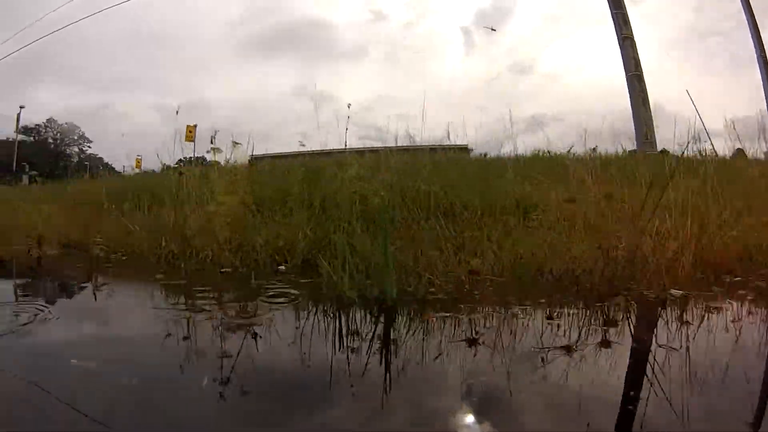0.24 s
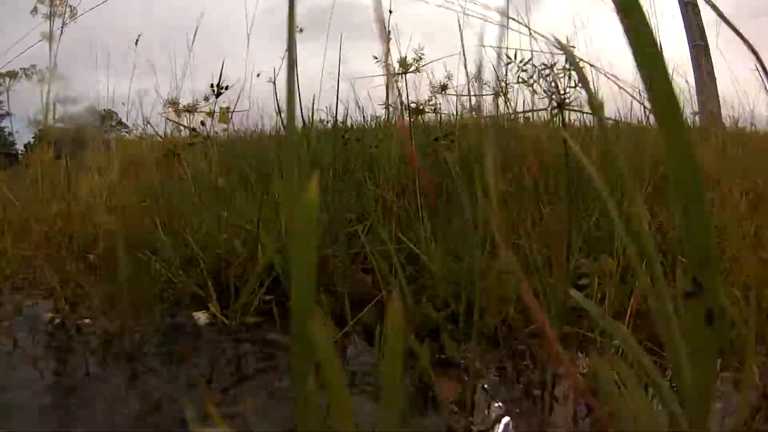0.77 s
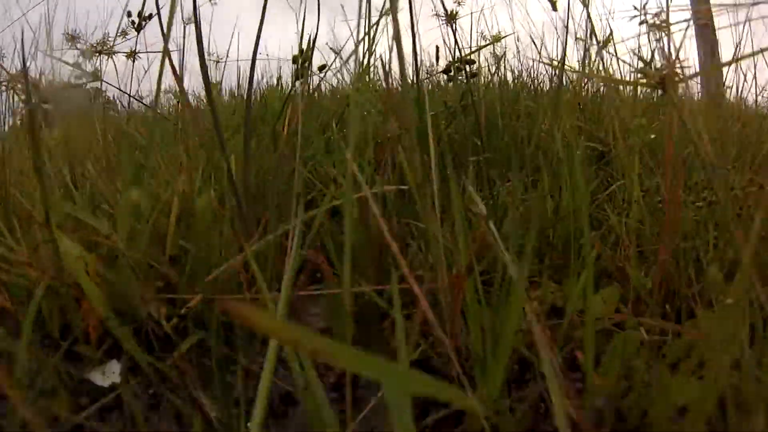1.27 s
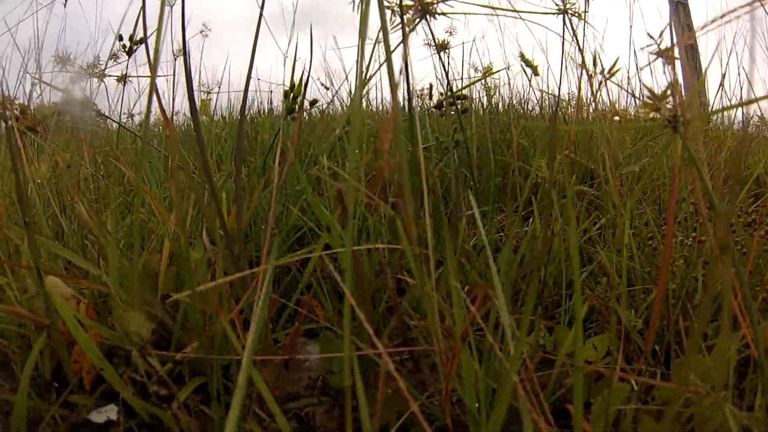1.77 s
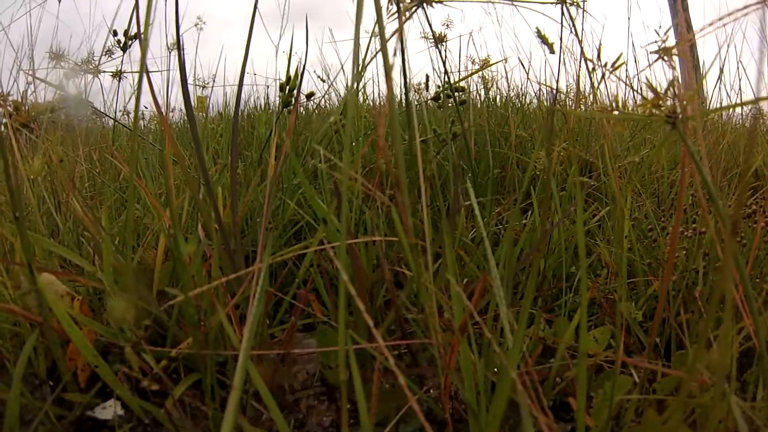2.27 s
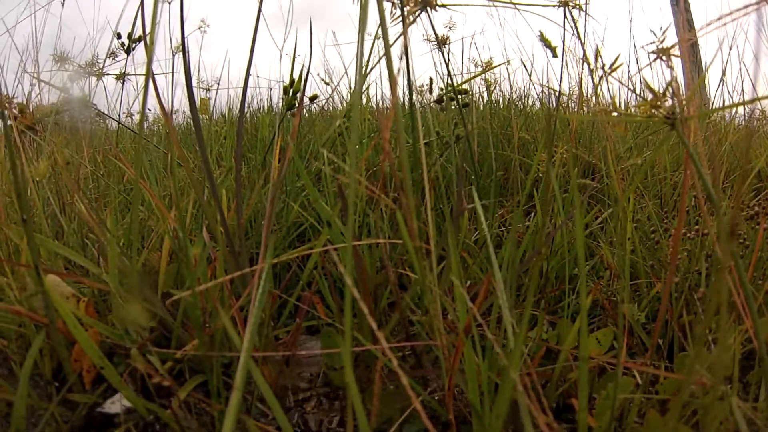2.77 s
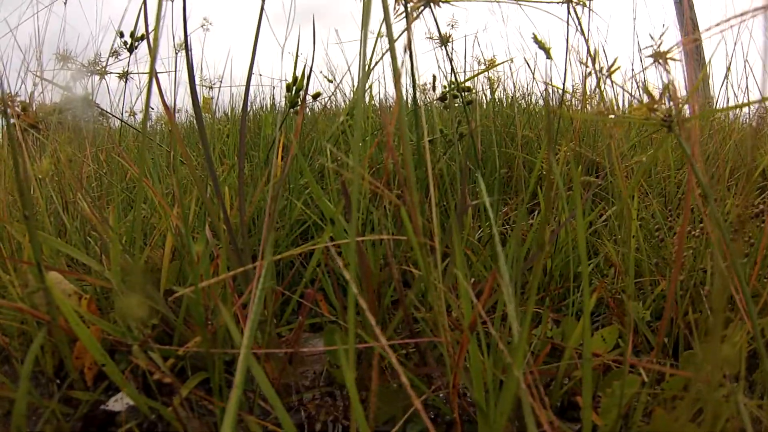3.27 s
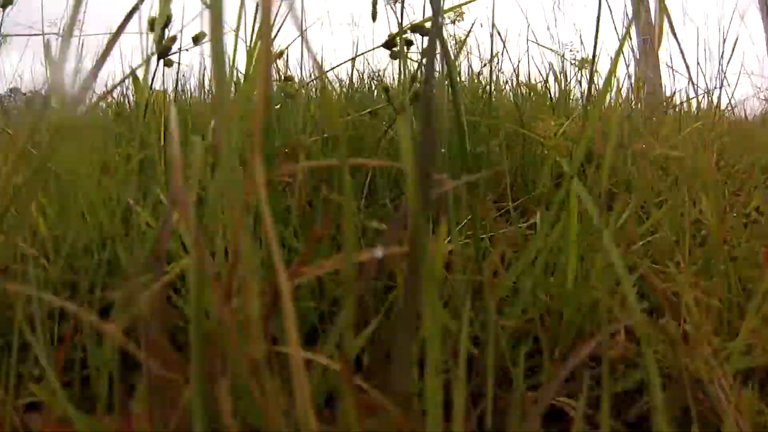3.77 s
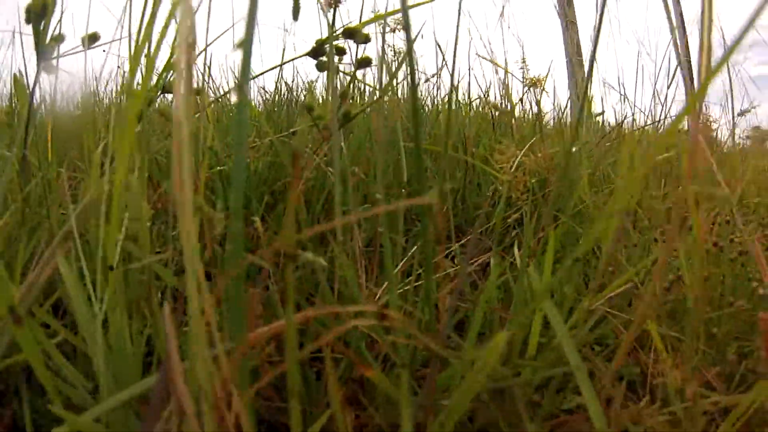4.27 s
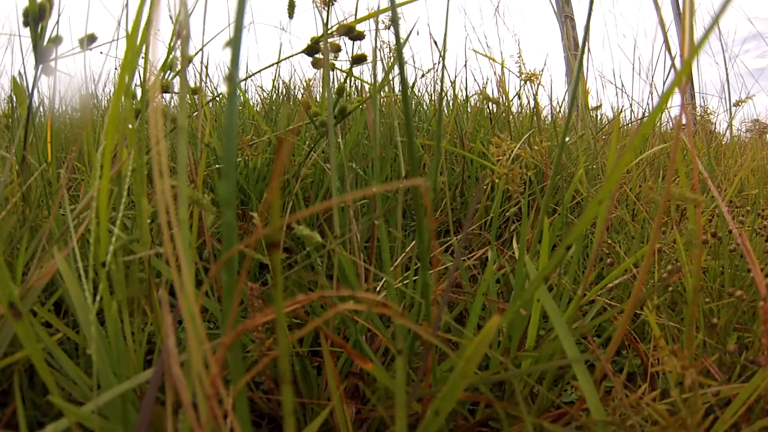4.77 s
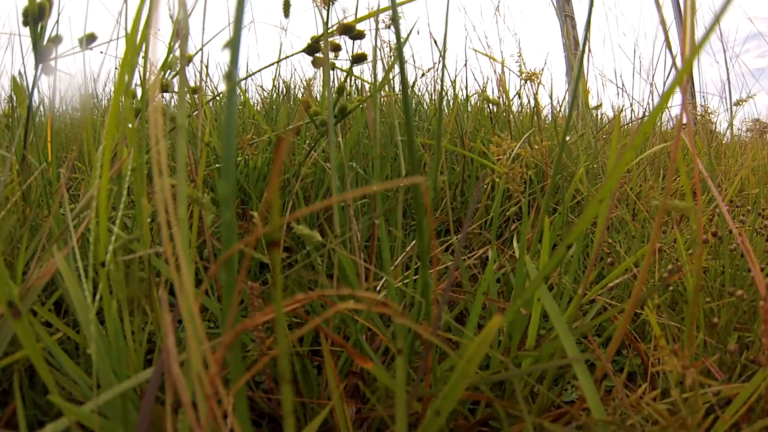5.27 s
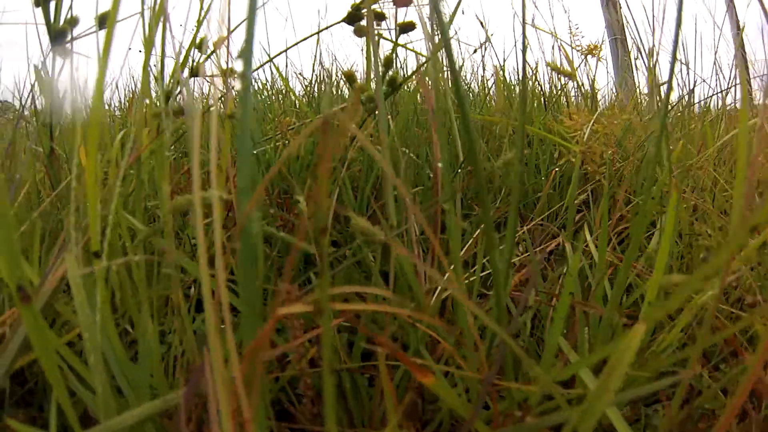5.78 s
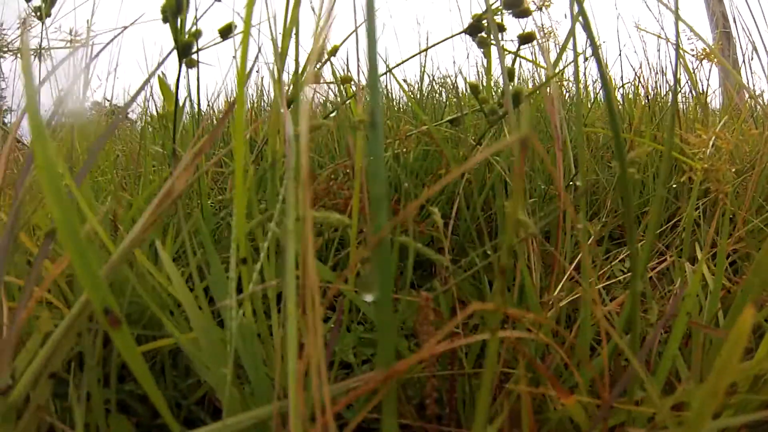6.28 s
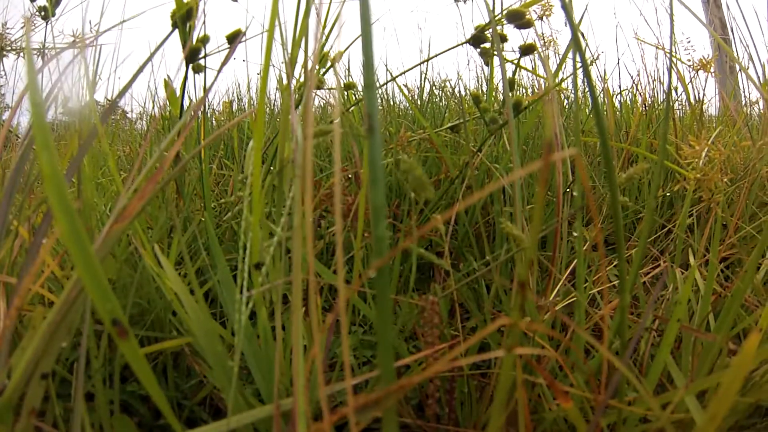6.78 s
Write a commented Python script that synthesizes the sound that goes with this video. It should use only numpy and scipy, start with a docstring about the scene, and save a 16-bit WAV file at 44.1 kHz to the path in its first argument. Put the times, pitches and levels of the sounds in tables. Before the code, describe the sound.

Ripples and knocks on a small boat's hull fade, then a servo whirs and an electric propeller whines up and down twice.

```python
"""A small electric airboat

Heard from its own deck, the boat coasts through shallow water, slapped by little waves, into grass.
The rudder's motor (a servo) clacks, whirs to and fro and ticks while holding still.
Twice the propeller motor stutters into motion, revs up with a whine, shakes the hull and runs down."""
import sys
import numpy as np
from scipy import signal
from scipy.fft import rfft, irfft
from scipy.io import wavfile
from scipy.ndimage import uniform_filter1d

SR = 44100
rng = np.random.default_rng(int(sys.argv[2]) if len(sys.argv) > 2 else 0)


def materialize(psi):
    """Save the field psi as 16-bit PCM at rate SR to the path in sys.argv[1].

    A 1-D psi becomes a single channel; in a 2-D psi each row is a channel.
    """
    bounded = np.clip(np.atleast_2d(psi).T, -1, 1)
    quanta = np.round(bounded * 32767).astype(np.int16)
    wavfile.write(sys.argv[1], SR, quanta)


N = 310464
TIME = np.arange(N) / SR
FULL_HZ = 142  # shaft turns a second at full speed

# the tone of grass on the hull: pitch_hz, level_db
GRASS = [(1500, 0.5), (4000, 1), (7500, -6.5), (10000, -23), (15000, -20)]
# how the servo's gearbox rings: pitch_hz, level_db
GEARBOX = [(500, -15), (850, -5.5), (1000, -8), (1350, 3), (1950, 10), (2250, 4), (2850, -0.5), (3200, -11),
           (3750, -7), (4600, -29), (5300, -20.5), (5950, -33), (6800, -28), (10000, -43)]
# each rev of the motor: start_s, catch_s (it takes hold), switching_end_s, blade_db, slowing_change_db
REVS = [(3.025, 3.33, 3.945, -28, -1.5), (5.119, 5.421, 6.165, -25, 5)]
# the jump in speed once the motor catches: after_catch_s, speed_hz
SPIN_UP = [(0, 24.7), (.013, 25.8), (.04, 39), (.08, 71.5)]


def amp(db):
    """Turns decibels into a gain."""
    return 10 ** (np.asarray(db) / 20)


def evened(x):
    """Scales x to an average strength (rms) of one."""
    return x / np.sqrt(np.mean(x ** 2) + 1e-20)


def steadied(x):
    """Takes the slow swell out of x."""
    return x / np.sqrt(abs(uniform_filter1d(x ** 2, size=2600)) + 1e-6)


def between(start, end):
    """One from start to end, with soft edges."""
    return uniform_filter1d(((TIME >= start) & (TIME <= end)) * 1., size=160)


def curve(rows):
    """Joins points in time with straight lines."""
    return np.interp(TIME, *np.transpose(rows))


def level(rows):
    """A decibel curve as a gain, silent outside its span."""
    return amp(curve(rows)) * between(rows[0][0], rows[-1][0])


def swells(rows, rise_db_per_s, fall_db_per_s):
    """Gain of events that swell to a peak and die away."""
    return np.max([amp(db - np.maximum(rise_db_per_s * (s - TIME), fall_db_per_s * (TIME - s)))
                   for s, db in rows], axis=0)


def gain_at(points, hz):
    """Looks up a gain among (pitch_hz, level_db) points."""
    pitches, db = np.transpose(points)
    return amp(np.interp(np.log(hz + 1), np.log(pitches + 1), db))


def colour(x, body):
    """Rings x through a body of (pitch_hz, level_db) points; comes out at strength one."""
    log_gain = np.log(gain_at(body, abs(np.fft.fftfreq(8192, 1 / SR))) + 1e-5)
    ring = np.fft.ifft(np.exp(np.conj(signal.hilbert(log_gain)))).real[:4096]  # its answer to one tap
    return evened(signal.oaconvolve(x, ring)[:len(x)])


def noise():
    """An even hiss (white noise)."""
    return rng.standard_normal(N)


def wander(hz):
    """A random wobble, up to about this rate."""
    return evened(irfft(rfft(noise()) / (1 + (np.fft.rfftfreq(N, 1 / SR) / hz) ** 4), N))


def grains(per_s, spread_db):
    """Scattered clicks of very uneven size."""
    clicks = noise() * (rng.random(N) < per_s / SR)
    return evened(clicks * amp(spread_db * np.minimum(rng.exponential(1, N), 4)))


def turning(hz):
    """The angle of something that turns at this rate."""
    return 2 * np.pi * np.cumsum(hz) / SR


def tones(angle, hz, multiples, flutter_db, body=None):
    """Fluttering tones at multiples of a turning rate, through a body if one is given."""
    out = 0
    for k, db in multiples:
        tone = np.sqrt(2) * np.cos(round(k) * angle + rng.uniform(0, 2 * np.pi))
        gain = amp(db + flutter_db * wander(19.4)) * (k * hz < SR / 2)
        out += tone * gain * (gain_at(body, k * hz) if body else 1)
    return out


def open_air():
    """The faint, steady hush of the outdoors."""
    # its tone: pitch_hz, level_db
    hush = [(24, -46.5), (40, -3.5), (346, -23.5), (1000, -26), (1260, -18), (1490, -30.5), (2110, -26.5),
            (3220, -33.5), (11700, -41), (15000, -46)]
    return colour(noise(), hush) * amp(-59.5)


def plop(hz, cycles):
    """A pocket of air rings briefly, rising a little in pitch."""
    turns = hz * np.arange(SR // 25) / SR
    return np.sin(2 * np.pi * turns * (1 + .002 * turns)) * (turns / cycles) * np.exp(1 - turns / cycles)


def wash():
    """Ripples and bubbles patter under the hull, fading as the boat coasts to a stop."""
    # the water's tone: pitch_hz, level_db
    water = [(110, -3.5), (165, -0.5), (230, -8), (318, -18), (620, -13.5), (787, -22.5), (984, -13.5),
             (1340, -2.5), (1510, -9.5), (2130, -4.5), (2440, -8), (3100, -24.5), (3560, -18.5),
             (4760, -37.5), (12000, -54), (15600, -107), (22000, -120)]
    # its fade: time_s, level_db
    coast = [(0, -31.5), (.12, -47), (.17, -35), (.42, -35), (.62, -45), (1.14, -40), (1.42, -49),
             (1.85, -80)]
    bubbles = sum(signal.oaconvolve(grains(per_s=70, spread_db=1.5), plop(hz, cycles=1.6))[:N]
                  for hz in np.geomspace(600, 3200, num=28))
    ripples = steadied(colour(evened(bubbles) + 1.84 * noise(), water))
    return ripples * amp(1.5 + 2.6 * wander(45)) * level(coast)


def rocking():
    """The floating hull rumbles, louder at each lurch."""
    # the hull's rumble: pitch_hz, level_db
    rumble = [(8.8, -27.5), (15, 7.5), (46, -0.5), (76, -6.5), (133, -19), (168, -40), (265, -22.5),
              (344, -43.5), (400, -42.5), (520, -79), (880, -120)]
    # its lurches: peak_s, level_db
    lurches = [(.17, -22.5), (.39, -22), (.78, -31), (1.17, -34), (1.37, -41), (2.45, -33.5), (3.35, -30),
               (3.72, -35), (4.17, -25.5), (5.47, -31.5), (5.98, -31), (6.35, -28)]
    gain = swells(lurches, rise_db_per_s=56, fall_db_per_s=82.5) + amp(-54.5)
    return steadied(colour(noise(), rumble)) * gain


def blow(start_s, db, body, rise_s, ring_s):
    """A short puff of force rings a body, peaking at db."""
    t = np.arange(SR // 5) / SR
    force = rng.standard_normal(len(t)) * (1 - np.exp(-t / rise_s)) * np.exp(-np.log(1000) * t / ring_s)
    ring = colour(force, body)
    return np.pad(amp(db) * ring / abs(ring).max(), (round(max(start_s, 0) * SR), N))[:N]


def knocks():
    """Hollow knocks on the hull: first waves slap it, later the servo clacks and the motor knocks."""
    # the knocks: start_s, relative_level_db, pitch_hz
    hits = [(0.048, -22, 1060), (0.13, -12, 1310), (0.167, -26, 1770), (0.268, -20, 1300),
            (0.378, -17.5, 1170), (0.467, -15, 1293), (0.507, -20.5, 1150), (0.565, -21, 1285),
            (0.589, -24.5, 1210), (0.712, -27, 1170), (0.741, -18.5, 1266), (1.067, -22.5, 2340),
            (1.147, -24, 2100), (1.371, -31.5, 2300), (1.654, -39.5, 1270), (2.123, -26.5, 1980),
            (2.443, -22.5, 1990), (2.5, -26, 1980), (3.061, -13, 1777), (3.179, -20.5, 2130),
            (3.22, -19, 2190), (3.257, -22, 1320), (4.827, -23, 2020), (5.346, -30.5, 2130)]
    hull = [(200, -24), (600, -7), (950, 1), (1300, 2.5), (1600, 12.5), (2100, 6), (2800, -7),
            (4000, -24.5), (5000, -32.5), (12000, -52)]
    out = np.zeros(N)
    for s, db, hz in hits:
        out += blow(s - .0025, db - 5.5, hull, rise_s=.005, ring_s=.042)
        out += amp(db - 3) * np.pad(plop(hz, cycles=2.7), (round((s + .00057) * SR), N))[:N]
    return out


def grass():
    """Stems flick the bow and brush along the hull."""
    # the flicks: start_s, relative_level_db
    stems = [(0.7552, -41), (0.9527, -47), (0.9882, -33.5), (1.059, -32), (1.0674, -28), (1.1344, -39.5),
             (1.1721, -31), (1.371, -49)]
    # the brushing: time_s, level_db
    brushing = [(0.93, -93), (1.0, -47.5), (1.08, -53.5), (1.11, -55), (1.16, -68), (1.23, -57),
                (1.28, -84)]
    flicks = sum(blow(s, db + 4, GRASS, rise_s=.00051, ring_s=.016) for s, db in stems)
    rustle = colour(grains(per_s=1500, spread_db=2.5) + .5 * noise(), GRASS)
    return flicks + rustle * level(brushing)


def sweep(start, end, top_hz, slowing_s, db, tone_db):
    """Pitch, tone strength and gain of one rudder move: the gears strain and sing as they slow."""
    age = np.maximum(TIME - start, 0)
    slowing = np.clip(1 - (end - TIME) / slowing_s, 0, 1)
    hz = top_hz * (1 - .15 * np.exp(-age / .04)) * (1 - .32 * slowing ** 1.5)
    tone = amp(tone_db + 16 * np.minimum(2 * slowing, 1))
    fades = np.minimum(age / .01, 1) * np.clip((end - TIME) / .064, 0, 1)
    gain = amp(db + 2.5 * np.sin(np.pi * slowing)) * fades
    return np.array([hz, tone, gain]) * ((TIME >= start) & (TIME < end))


def chatter(angle, count):
    """Contacts strike at the same places in every turn."""
    out = np.zeros(N)
    for place, force in zip(np.sort(rng.random(count)), rng.standard_normal(count)):
        out += force * (np.diff(np.floor(angle / (2 * np.pi) - place), prepend=0) > 0)
    return evened(out)


def servo():
    """A ten-tooth gear whirs against chattering gears; the rudder judders on its linkage."""
    # rudder moves: start_s, end_s, tooth_rate_hz, slowing_s, level_db, tone_over_noise_db
    moves = [(2.118, 2.412, 1555, 0.19, -38, -8), (2.41, 2.976, 1494, 0.19, -40, -11),
             (4.666, 5.359, 1377, .26, -39, -9.5), (6.94, 7.51, 1390, 0.23, -40.5, -27)]
    # tones of the meeting teeth: multiple_of_tooth_rate, level_db
    teeth = [(1, -1), (2, 3), (3, 1), (4, -1), (6, -6)]
    # judders of the linkage: peak_s, level_db
    judders = [(2.27, -27.5), (2.59, -37.5), (2.8, -43.5), (4.95, -37.5), (5.19, -27.5)]
    hz, tone, gain = sum(sweep(*move) for move in moves)
    hz = np.maximum(hz, 1000) * (1 + .003 * wander(70) + .009 * wander(400) * np.minimum(tone, 1))
    angle = turning(hz)
    gear_angle = angle / 10
    grit = noise() * amp(1.6 * np.cos(gear_angle) + 2 * wander(130))
    gears = colour(evened(grit) + .39 * chatter(gear_angle, count=10), GEARBOX)
    wobble = .3 * np.sin(gear_angle)  # the gear sits off centre
    song = steadied(tones(angle + wobble, hz, teeth, flutter_db=2.5, body=GEARBOX))
    whir = (gears + tone * song) / np.sqrt(1 + tone ** 2)
    judder = colour(noise(), [(40, 9), (110, 5.5), (200, -.5), (300, -6.5), (480, -51), (1500, -66)])
    return whir * gain + judder * (swells(judders, 259, 259) + gain * amp(-14))


def shaft_speed(crawl_hz_per_s=36, run_down_s=.2):
    """Turns a second: a crawl, a sudden spin-up, the throttle, then a free run-down."""
    # speed set by the throttle, one list a rev: time_s, speed_hz
    throttles = [
        [(3.45, 94.4), (3.5, 109.3), (3.596, 122.0), (3.73, 134.3), (3.82, 138.6), (3.898, 130.6),
         (3.962, 114.6), (4.042, 94.5), (4.1, 80.1)],
        [(5.53, 93.1), (5.562, 109.9), (5.646, 130.0), (5.702, 136.4), (5.798, 141.1), (5.96, 142.0),
         (6.046, 135.8), (6.158, 111.9), (6.25, 92.0), (6.32, 69.7)],
    ]
    hz = np.ones(N)
    for (start, catch, *_), throttle in zip(REVS, throttles):
        crawl = (start, SPIN_UP[0][1] - crawl_hz_per_s * (catch - start))
        driven = curve([crawl] + [(catch + s, speed) for s, speed in SPIN_UP] + list(throttle))
        run_down = np.exp(-np.maximum(TIME - throttle[-1][0], 0) / run_down_s)
        hz = np.where(TIME >= start, driven * run_down, hz)
    return hz


def stutter(angle, hz):
    """At a crawl the motor jerks from magnet to magnet, ringing its shell and thudding into the hull."""
    # tones of the jerks: multiple_of_shaft, level_db
    jerks = [(126, -16), (147, -30), (168, -2)]
    # strength of the stutter: speed_hz, level_db
    strength = [(14, -42), (18, -42), (20, -55), (25, -49.5), (42, -31.5), (70, -62)]
    shell = [(1000, -13), (2400, -10), (2900, 18), (3350, 5.5), (3700, -29.5), (4400, -18), (5300, -7),
             (7000, -37), (12000, -53)]
    hull = [(100, -30), (200, 1.5), (300, 12), (380, -24.5), (500, -17), (1500, -55)]
    kicks = noise() * amp(3 * np.cos(7 * angle))  # seven pairs of magnets
    singing = np.clip((hz - 18) / 4, 0, 1) * np.clip((34 - hz) / 6, 0, 1)
    song = tones(angle, hz, jerks, flutter_db=1.5, body=shell) * singing
    clatter = colour(kicks, shell) * amp(-.5) + colour(kicks, hull) * amp(1.5)
    return (clatter + song) * gain_at(strength, hz)


def shake(angle, speed):
    """The unbalanced propeller shakes the hull, most at the hull's own low note."""
    # strength of the shake: speed_hz, level_db
    strength = [(8, -72), (25, -49.5), (50, -38), (68, -19.5), (98, -15), (112, -18.5), (126, -32),
                (142, -32.5)]
    return np.sqrt(2) * np.sin(angle) * gain_at(strength, speed) * amp(.8 * wander(20))


def rattle(angle, hz, speed, fast, starting, torque):
    """The motor's mount knocks loosely when slow and buzzes evenly when fast."""
    # tones of the mount: multiple_of_shaft, level_db
    mount = [(10, 4), (11, 4.5), (12, 7), (13, 14), (14, 9), (15, 7.5), (16, 2), (17, 0.5), (18, 10)]
    # how the hull passes them on: pitch_hz, level_db
    hull = [(60, -7), (280, -6), (480, -16), (850, -11), (1020, -23.5), (1320, 7), (1550, -12), (1800, 1.5),
            (1980, -5), (2230, 8.5), (2650, -18), (3300, -34.5), (4300, -55.5), (9000, -61)]
    # strength of the rattle: speed_hz, level_db
    strength = [(8, -74), (22, -57), (44, -50.5), (62, -28), (85, -25), (142, -21.5)]
    buzz = steadied(tones(angle, hz, mount, flutter_db=3.5, body=hull))
    chafe = amp(3.5 * np.cos(angle) + 1.5 * wander(120))
    loose = colour(noise() * chafe, hull)
    blend = np.sqrt(.84 * fast) * buzz + np.sqrt(1 - .84 * fast) * loose
    jolts = starting * np.minimum(hz / SPIN_UP[0][1], 1) ** 2 * amp(-34) + torque * amp(-27.5)
    return blend * np.maximum(gain_at(strength, speed), jolts)


def flare(hz, centre_hz, width_hz):
    """One at a speed that makes the motor's case ring, less on either side."""
    return np.exp(-((hz - centre_hz) / width_hz) ** 2)


def whine(angle, hz, fast, drive, torque, slowing):
    """The magnets whine loudly when driven, throb once a turn and flare where the case rings."""
    # tones of the magnets: multiple_of_shaft, level_db
    magnets = [(42, 0), (84, -27)]
    # how the motor's coils ring: pitch_hz, level_db
    coils = [(1050, -28), (1300, -4), (2300, 0), (3000, -6), (3600, -11), (3950, -18), (4300, -37),
             (4750, -22), (5500, -21), (7000, -24), (20000, -70)]
    throb = amp(2.5 * np.cos(angle) + 2.5 * wander(150))
    gain = (drive * (1 - .2 * torque) + .2 * fast ** 3 * (1 - drive)) * amp(-20.5)
    gain += torque * flare(hz, centre_hz=58, width_hz=14) * amp(-17)
    gain += slowing * flare(hz, centre_hz=76, width_hz=6) * amp(-33)
    ragged = angle + .011 * wander(140) + .01 * torque * wander(450)
    return tones(ragged, hz, magnets, flutter_db=1.5, body=coils) * gain * throb


def surge(angle, hz):
    """The heavy current of a hard spin-up adds a ragged tone an octave above the whine."""
    case = [(2000, -8), (2800, 0), (3500, -2), (4400, -19), (7000, -23), (9000, -42)]
    return tones(angle + .009 * wander(220), hz, [(84, 0)], flutter_db=3.5, body=case) * amp(-29)


def controller(speed, switch_hz=7825, sag_hz_per_s=120, beat_fade_s=.2):
    """The speed controller chops the current: a thin, sagging tone that beats with the whine."""
    beat_body = [(2300, -28), (2900, 27.5), (3400, 24.5), (3900, -5), (4500, -20)]
    out = np.zeros(N)
    for _, catch, end, *_ in REVS:
        age = TIME - catch
        hz = switch_hz - sag_hz_per_s * age + 6 * wander(78)
        beat_hz = hz - 42 * speed  # the gap to the whine's pitch
        beat = np.sin(turning(beat_hz)) * gain_at(beat_body, abs(beat_hz))
        beat *= np.clip(1 - age / beat_fade_s, 0, 1)
        out += np.sqrt(2) * (np.sin(turning(hz)) + beat) * between(catch, end)
    return out * amp(1.4 * wander(60) + np.interp(speed, [100, FULL_HZ], [-51.5, -53]))


def rushing_air(angle, octaves, torque):
    """Air hisses through the propeller, pulsing twice a turn."""
    # the tone of the hiss: pitch_hz, level_db
    air = [(300, -12.5), (1000, 7.5), (3000, 11), (3800, 7), (4500, -4.5), (5500, 0), (7000, -5),
           (8200, -9), (8800, -10.5), (10500, -16), (15000, -26.5)]
    hiss = colour(noise() * amp(2.5 * np.cos(2 * angle) + 1.15 * wander(66)), air)
    return hiss * np.maximum(amp(-33.5 + 19.5 * octaves), torque * amp(-41.5))


def blades(angle, hz, octaves, revving, slowing):
    """The propeller's blades hum; their pulses sharpen near full speed."""
    # tones of the blades: multiple_of_shaft, level_db
    notes = [(2, -0.5), (3, -6), (4, -10), (5, -22), (6, -6), (7, -16.5), (8, -7.5), (9, -6)]
    sharpness = np.clip(hz / FULL_HZ, 0, 1) ** 9
    blade_db, change_db = (sum(rev[k] * on for rev, on in zip(REVS, revving)) for k in (3, 4))
    hum = tones(angle, hz, notes[:1], flutter_db=1) * amp(change_db * slowing)
    hum += sharpness ** .3 * tones(angle, hz, notes[1:2], flutter_db=1)
    hum += sharpness * tones(angle, hz, notes[2:], flutter_db=2.5)
    return hum * amp(blade_db + 7.5 * octaves) * np.clip((hz - 30) / 60, 0, 1)


def magnet_hum(angle, hz):
    """Near full speed the magnets sing a clean note an octave under the whine."""
    return np.sqrt(2) * np.sin(21 * angle) * np.clip((hz - 115) / 20, 0, 1) * amp(-34.5 + 1.2 * wander(25))


def motor(speed):
    """One shaft drives all these sounds, by its speed and how quickly that changes."""
    revving = [between(start + .005, start + 2) for start, *_ in REVS]
    starting = sum(between(start, catch + SPIN_UP[-1][0]) for start, catch, *_ in REVS)
    rise_hz_per_s = uniform_filter1d(np.gradient(speed) * SR * sum(revving), size=900)
    drive = np.clip(rise_hz_per_s / 120, 0, 1)
    slowing = np.clip(-rise_hz_per_s / 120, 0, 1)
    torque = np.clip(rise_hz_per_s / 800, 0, 1)  # twisting force: one in a hard spin-up
    hz = speed * (1 + .0007 * wander(25))
    angle, octaves = turning(hz), np.log2(speed / FULL_HZ)
    fast = np.clip((hz - 60) / 75, 0, 1)
    return (shake(angle, speed) + blades(angle, hz, octaves, revving, slowing)
            + whine(angle, hz, fast, drive, torque, slowing) + surge(angle, hz) * torque
            + rattle(angle, hz, speed, fast, starting, torque) + rushing_air(angle, octaves, torque)
            + stutter(angle, hz) * starting + magnet_hum(angle, hz))


def servo_ticks(pulse_s=.022):
    """Holding still against a load, the servo twitches once for each control pulse."""
    # the holds: start_s, end_s, level_db
    holds = [(4.2, 4.5, -64), (6.3, 6.95, -62)]
    ticks = np.diff(np.floor(TIME / pulse_s), prepend=0) > 0
    gain = sum(amp(db) * between(start, end) for start, end, db in holds)
    return colour(ticks * amp(1.2 * wander(30)), GEARBOX) * gain


def scene():
    """Everything aboard, over the quiet of open air."""
    speed = shaft_speed()
    return (open_air() + motor(speed) + controller(speed) + servo() + servo_ticks()
            + wash() + rocking() + knocks() + grass())[None]


def record(dry):
    """Cuts the highest treble, above 15350 Hz."""
    return signal.oaconvolve(dry, signal.firwin(511, 15350, window=("kaiser", 9), fs=SR)[None], "same")


dry = scene()
out = record(dry)
materialize(out)
```